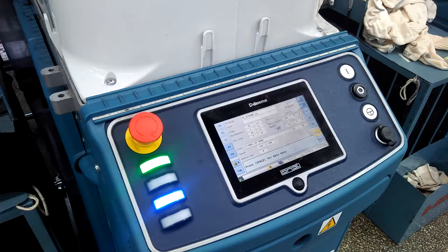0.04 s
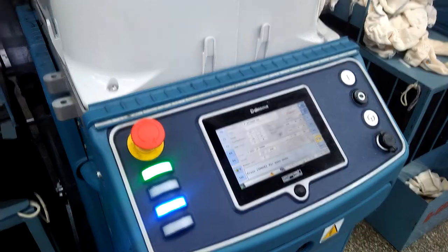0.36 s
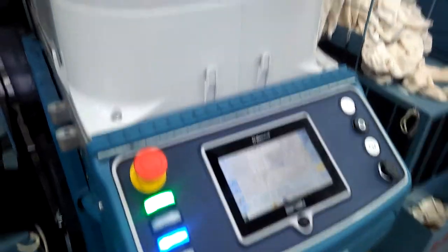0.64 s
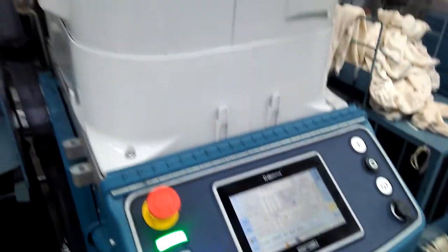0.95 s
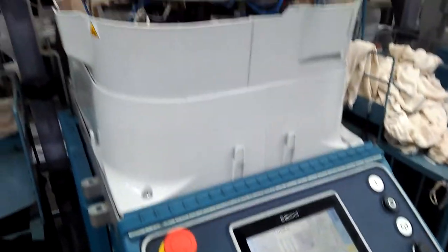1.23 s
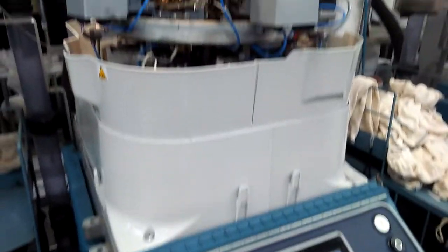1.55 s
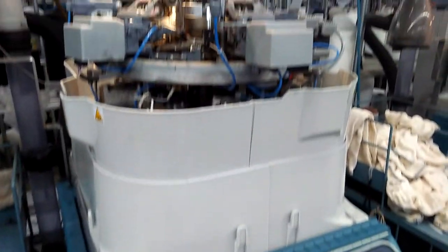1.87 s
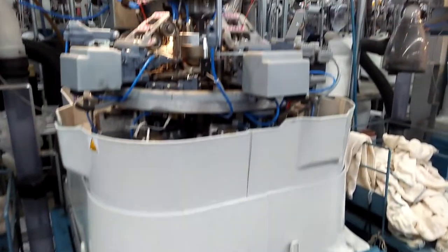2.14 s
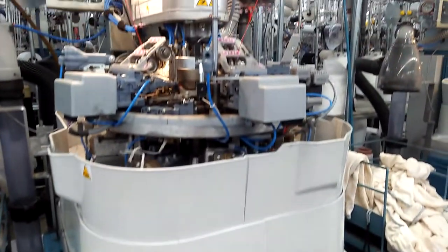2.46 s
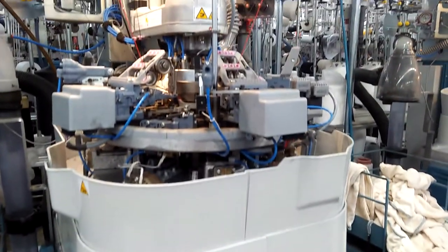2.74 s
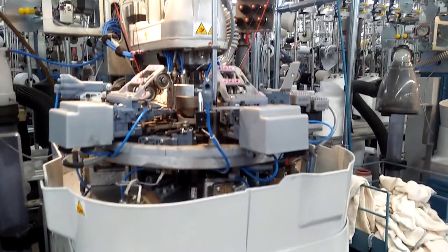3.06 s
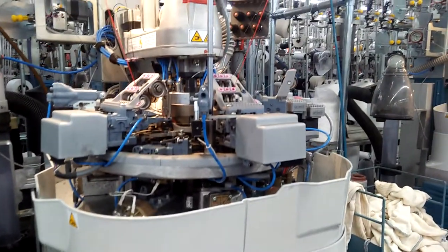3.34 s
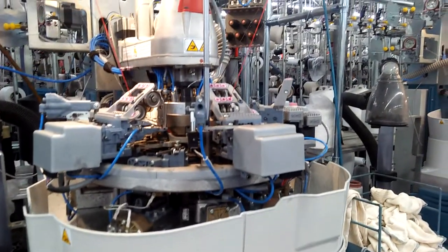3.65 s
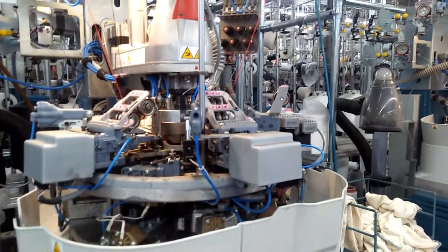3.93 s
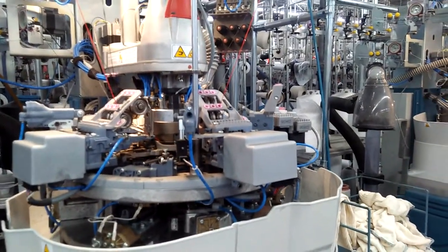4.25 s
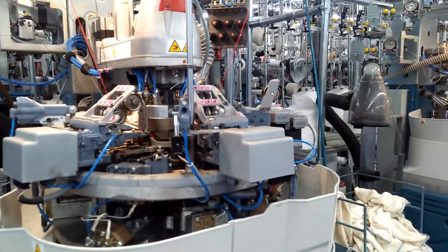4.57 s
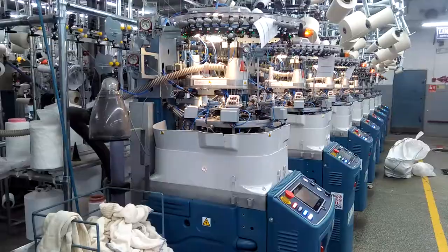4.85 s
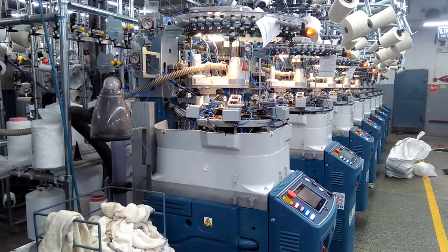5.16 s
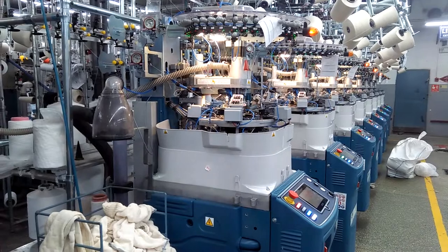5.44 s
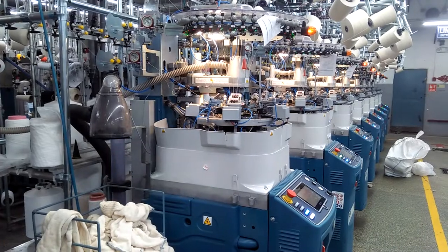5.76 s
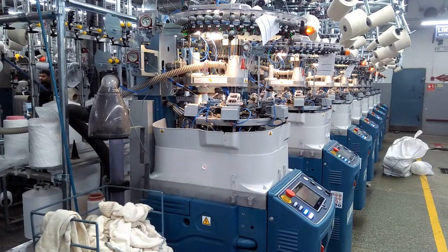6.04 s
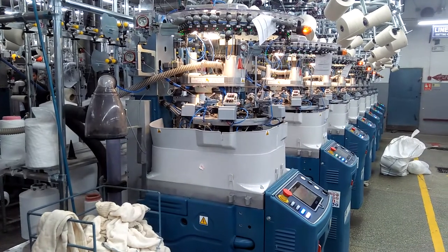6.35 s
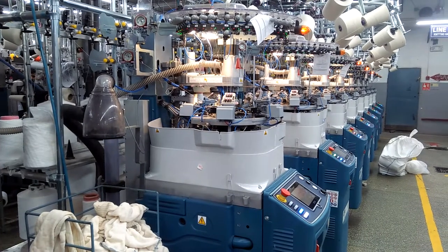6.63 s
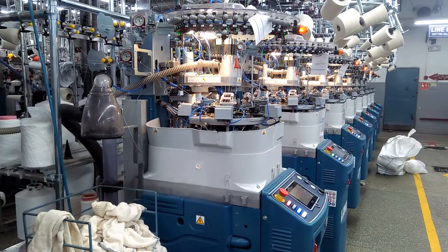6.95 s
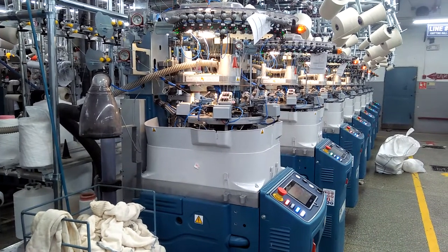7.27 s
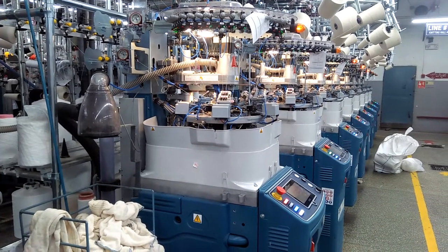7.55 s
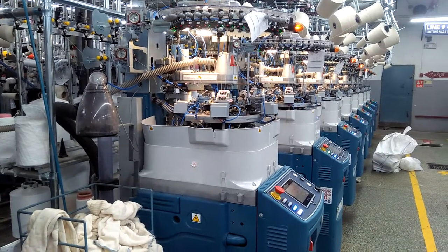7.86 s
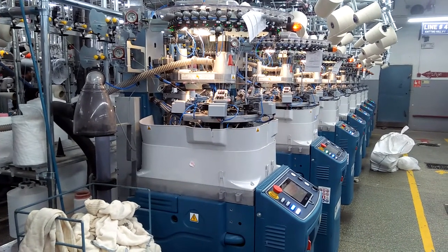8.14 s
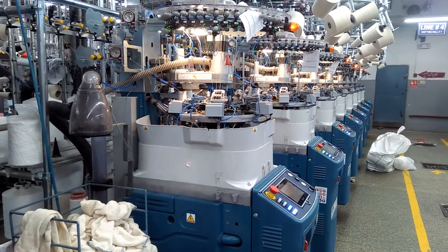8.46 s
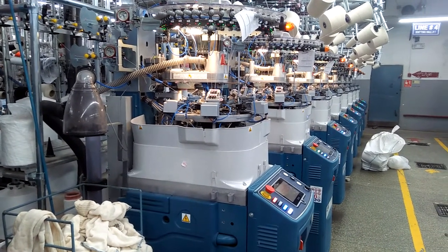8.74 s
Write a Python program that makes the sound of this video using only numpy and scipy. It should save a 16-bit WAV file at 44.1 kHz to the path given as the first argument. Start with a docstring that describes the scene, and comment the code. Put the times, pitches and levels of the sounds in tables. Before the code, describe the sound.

Many knitting machines clatter in a dense steely din over rumbling drives, with hisses and spits of compressed air.

```python
"""Sock knitting machines clatter: needles hit their cams and blur into one dense, steely din.
We hear it first beside one machine, then louder along the aisle. Levers knock and ring in the
hard-walled hall, pneumatic valves spit, compressed air hisses, and small parts scrape and ping.
Underneath sits a bed of rumbling drives and the slowly beating hum of two motors."""
import sys
import numpy as np
from scipy import signal
from scipy.fft import rfft, irfft, next_fast_len
from scipy.io import wavfile
from scipy.ndimage import uniform_filter1d, map_coordinates

SR = 44100
rng = np.random.default_rng(int(sys.argv[2]) if len(sys.argv) > 2 else 0)


def generate_wav(signal):
    """Clip the signal to [-1, 1] and save it as 16-bit WAV at the path in sys.argv[1]."""
    frames = np.transpose(np.atleast_2d(signal))
    scaled = np.clip(frames, -1, 1) * 32767
    pcm = np.round(scaled).astype(np.int16)
    wavfile.write(sys.argv[1], SR, pcm)


N = 388080
START_S, TOP_HZ = 0.7745, 14330
AISLE_S, WALK_S = 4.832, .4  # tone colour switches at AISLE_S; levels glide over WALK_S around it


# EQ of the din beside one machine: freq_hz, gain_db
NEAR_DIN_EQ = [(440, -2.0), (600, -3), (740, -2), (830, -3.5), (1010, -3), (1130, -3.0), (1450, -5.5),
               (1700, -4), (1900, -2.5), (2200, -1), (2450, -3.5), (2800, -6), (3400, -14), (4500, -15)]
# EQ of the din in the aisle: freq_hz, gain_db
AISLE_DIN_EQ = [(440, 0), (600, -2.5), (760, -4.5), (920, -2), (1010, -2), (1130, -1.5), (1500, -2),
                (1700, -2), (2000, 2), (2400, -1.5), (2700, -6.5), (3000, -8), (3400, -14), (4500, -19.5)]
# fader for the drone of the frames, before its trim: time_s, level_db
FRAME_FADER = [(0.8, -40.5), (2.6, -40), (3.6, -41), (3.8, -40.0), (4.2, -41), (4.6, -40.0), (5.1, -34.5),
               (5.5, -35.5), (6.2, -34.5), (6.9, -38), (7.0, -35.5), (7.4, -37), (7.5, -33.5), (8.78, -38)]
# fader for cams and needles, before their trims: time_s, level_db
CLATTER_FADER = [(0.8, -39), (1.0, -40.0), (1.1, -36), (1.8, -37.5), (3.7, -35.5), (4.5, -37.5), (5.1, -31),
                 (5.4, -30.5), (5.5, -33.5), (6.0, -29.5), (6.1, -31.5), (6.5, -30.5), (6.6, -32.5),
                 (7.1, -32.5), (7.3, -31.5), (8.1, -33.0), (8.2, -30.5), (8.78, -33.0)]

def clatter(blows_db=-5, near_clinks_db=-13, aisle_clinks_db=-10, surge_db=0.4):
    """Needles hit their cams; near blows stay distinct, the rest blur into the hall."""
    din = patchy_noise(patchy_db=2.0, bins=4, frames=4)
    din += amp(blows_db) * impacts(per_s=1200, scatter_db=2.5)
    din += amp(walk(near_clinks_db, aisle_clinks_db)) * clinks()
    din *= amp(cylinder_swell_db() + surge_db * wobble(60))  # the blows come in uneven bunches
    layer = lambda db, shape: amp(db) * place_eq(din, NEAR_DIN_EQ, AISLE_DIN_EQ, shape)
    frame_db, clatter_db = fader(FRAME_FADER), fader(CLATTER_FADER)
    frame = layer(frame_db + walk(-0.088, -0.64), lambda hz: band(hz, 382, 1120) * hollows(hz))
    # 1j shifts the phase a quarter turn, so neighbouring bands add in power
    cams = layer(clatter_db + walk(-2.5, -4.0), lambda hz: 1j * band(hz, 1227, 1897))
    needles = layer(clatter_db + walk(-3.0, -4.0), lambda hz: band(hz, 1940, 4780))
    return frame + cams + needles


def clinks(count=2000, t60=0.083, spread_db=6, lowest_hz=450, attack_s=0.0011):
    """Steel parts all over the hall, each ringing briefly at its own pitch; rms 1."""
    track, t = np.zeros(N), np.arange(SR // 22) / SR
    envelope = strike(t, attack_s, t60)
    for when, pitch, force in rng.random((count, 3)):
        hz = lowest_hz * 6.5 ** pitch
        gain = amp(spread_db * force) * np.sqrt(hz)
        add(track, when * N / SR, gain * envelope * np.sin(2 * np.pi * hz * t))
    return unit(track)


# nearest needle cylinder, beside one machine and then in the aisle: turn_rate_hz, crest_s, depth_db
CYLINDER_TURNS = [(3.42, 1.12, 0.3), (4.16, 5.11, 0.4)]

def cylinder_swell_db():
    """The din rises and falls once with each turn of the nearest cylinder."""
    t = np.arange(N) / SR
    near, aisle = (depth_db * np.cos(2 * np.pi * turn_rate_hz * (t - crest_s))
                   for turn_rate_hz, crest_s, depth_db in CYLINDER_TURNS)
    return walk(near, aisle)


# levers and cams striking home: start_s, relative_db, ring_hz
LEVER_HITS = [(4.898, -16, 2093), (4.982, -18.5, 2435), (5.138, -7.5, 2104), (5.336, -12, 1700),
              (5.828, -16, 1730), (6.185, -15.5, 977), (6.217, -14.5, 1940), (6.271, -14, 2260),
              (6.499, -10.5, 1705), (6.755, -17, 1555), (6.967, -13, 1766), (8.25, -14, 1610),
              (8.447, -14.5, 924)]

def knocks(t60=0.052, attack_s=0.0018, modes=20, trim_db=-8.5, wet_db=-7):
    """A lever lands and rings a cluster of short-lived steel modes; the hall answers."""
    track, t = np.zeros(N), np.arange(SR // 8) / SR
    for start_s, db, ring_hz in LEVER_HITS:
        modes_hz = ring_hz * rng.triangular(.35, .9, 1.45, (modes, 1))
        ring = unit(np.sin(2 * np.pi * (modes_hz * t + rng.random((modes, 1)))).sum(0))
        add(track, start_s, amp(db + trim_db) * strike(t, attack_s, t60) * ring)
    return track + amp(wet_db) * hall(track)


# EQ of a valve's spit: freq_hz, gain_db
SPIT_EQ = [(1000, -12), (3000, -6), (4800, -13), (5800, 2), (7500, 1.5), (9500, 0.5), (12000, -3),
           (14000, 1)]
# valve cues, with thud and ping set against the burst: start_s, relative_db, thud_db, ping_hz, ping_db
VALVE_CUES = [(5.314, -30, -20, 6900, -8), (5.3237, -24.5, -10, 12500, -10), (5.5417, -37, -20, 13100, 2),
              (6.006, -29.5, -4, 5800, -1), (6.3895, -24.5, -18, 10400, -13), (6.4295, -26, -23, 7430, -3),
              (6.441, -28, -6, 5900, -6), (6.498, -12.5, -9.5, 3540, -15.5), (7.6911, -31, -8, 13500, -4),
              (7.9789, -33, 11.5, 11900, 0)]

def valves(spit_t60=0.019, thud_t60=0.038, ping_t60=0.024, ping_width_hz=330,
           trail_db=-23, trail_t60=0.39, attack_s=0.00065, trim_db=4.5):
    """Each valve spits a sharp burst that thuds and pings in its housing; air trails away after it."""
    track, t = np.zeros((2, N)), np.arange(SR // 2) / SR
    puff = lambda shape: unit(filtered(rng.standard_normal((2, len(t))), shape))
    spit = lambda hz: amp(along(SPIT_EQ, hz))
    focus = amp([[0], [-6]])  # mid, side: the hit is narrower than its trail
    for start_s, db, thud_db, ping_hz, ping_db in VALVE_CUES:
        resonance = lambda hz: 1 / (1 + ((hz - ping_hz) / ping_width_hz) ** 2)
        burst = amp(-60 * t / spit_t60) * puff(spit)
        thud = amp(thud_db - 60 * t / thud_t60) * puff(lambda hz: band(hz, 1760, 2830, order=5))
        ping = amp(ping_db - 60 * t / ping_t60) * puff(resonance)
        trail = amp(trail_db - 60 * t / trail_t60) * puff(spit)
        opening = amp(db + trim_db) * (1 - np.exp(-t / attack_s))
        add(track, start_s, opening * (focus * (burst + thud + ping) + trail))
    return widen(track)


# EQ of the air beside one machine: freq_hz, gain_db
NEAR_AIR_EQ = [(4200, -5.5), (5400, -0.5), (6300, 1.5), (7300, 4.5), (8500, -1), (10000, -4), (12500, -8.5),
               (14000, -4)]
# EQ of the air in the aisle: freq_hz, gain_db
AISLE_AIR_EQ = [(4200, 0), (5200, 1), (5900, 2.5), (6400, 2.5), (6900, 4), (8000, 0), (9500, -7),
                (11000, -8.5), (12500, -11), (13400, -4), (14000, -8)]
# air jets that open, blow and die away: start_s, length_s, hiss_db, spray_db
JET_CUES = [(0.742, 0.55, -43.7, -39.3), (1.45, 0.37, -52, -49.5), (1.966, .05, -53, -47),
            (2.267, 0.34, -51, -44.5), (2.834, .15, -57, -49), (3.17, 0.2, -54, -45.5),
            (4.11, 0.68, -52, -49.5), (5.15, .05, -45.5, -43.5), (5.3, 0.074, -43, -43),
            (5.564, 0.063, -50.5, -45), (6.006, 0.47, -47.5, -49), (6.4, .1, -43, -45.5),
            (6.935, .07, -53, -56), (7.197, .06, -55, -54), (7.393, .06, -52, -53),
            (7.69, 0.094, -47.5, -47.5), (7.964, 0.15, -52, -49.5), (8.727, .07, -51, -53)]

def air(hiss_db=(-51, -49.4), spray_db=(-51.3, -56), flutter_db=1.0, ticks_db=-10):
    """Suction tubes hiss steadily and jets blow over them; needle latches tick finely in the hiss."""
    power = amp([walk(*hiss_db), walk(*spray_db)]) ** 2
    for start_s, length_s, jet_hiss_db, jet_spray_db in JET_CUES:
        blow = swell(start_s, length_s, attack_s=0.0081, t60=1.44)
        power += (amp([[jet_hiss_db], [jet_spray_db]]) * blow) ** 2
    hiss_gain, spray_gain = np.sqrt(power)
    rush = patchy_noise(patchy_db=1.65, bins=8, frames=3)
    ticks = amp(ticks_db) * impacts(per_s=870, scatter_db=3.5)
    flow = np.array([rush + ticks, rng.standard_normal(N)])  # mid, side
    hiss = hiss_gain * place_eq(flow, NEAR_AIR_EQ, AISLE_AIR_EQ, lambda hz: band(hz, 4200, 9700))
    spray = spray_gain * place_eq(flow, NEAR_AIR_EQ, AISLE_AIR_EQ, lambda hz: 1j * band(hz, 8620, 13650))
    return widen(amp(flutter_db * wobble(32)) * (hiss + spray))


# parts that scrape and sing for a moment: start_s, length_s, level_db, pitch_hz
SCRAPE_CUES = [(2.219, .1, -42.5, 2127), (3.356, .16, -42, 2120), (7.22, 0.38, -35.5, 2407)]

def scrapes(width_hz=205, rough_db=1.1, flat_share=.16, rise_s=0.064):
    """Rubbing steel sings in one rough resonance that starts flat and slides up as the part takes hold."""
    track, t = np.zeros(N), np.arange(N) / SR
    for start_s, length_s, db, pitch_hz in SCRAPE_CUES:
        glide_hz = pitch_hz * (1 - flat_share * np.exp(-np.maximum(t - start_s, 0) / rise_s))
        envelope = swell(start_s, length_s, attack_s=.02, t60=2.5)
        track += amp(db) * envelope * fuzzy_tone(glide_hz, width_hz)
    return amp(rough_db * wobble(25)) * track


# light taps on steel: start_s, level_db
PING_CUES = [(1.02, -41), (3.345, -38)]

def pings(ring_hz=3750, t60=0.066, attack_s=.001):
    """A small steel part is tapped and rings at one pitch."""
    track, t = np.zeros(N), np.arange(SR // 8) / SR
    for start_s, db in PING_CUES:
        add(track, start_s, amp(db) * strike(t, attack_s, t60) * np.sin(2 * np.pi * ring_hz * t))
    return track


# EQ of the drives' rumble: freq_hz, gain_db
RUMBLE_EQ = [(20, -22), (36, -20), (48, -20), (62, 0.5), (100, 0), (122, 4), (138, -1), (156, 3.5),
             (185, -2.5), (260, 0), (315, 0), (400, -9), (520, -29)]
# fader for the rumble, before its trim: time_s, level_db
RUMBLE_FADER = [(0.8, -49), (1.1, -51.0), (1.5, -43.5), (1.6, -48.5), (4.1, -48.0), (4.3, -49),
                (4.8, -49.5), (4.9, -42.5), (5.5, -42.5), (5.9, -45.0), (7.6, -40.5), (7.9, -43),
                (8.3, -40.5), (8.78, -45)]
# blurred tones of gears and spindles: pitch_hz, width_hz, relative_db
GEAR_TONES = [(159, 9, -57), (313.3, 27, -59), (424.4, 12, -64.5), (600.5, 40, -51), (911, 40, -51),
              (1010, 40, -54), (6860, 86, -66)]

def drives(near_whirr_db=-7, aisle_whirr_db=-1.0, trim_db=0.28, drift_db=0.8):
    """Belts and gears rumble and whirr; the aisle opens onto more of them."""
    noise = patchy_noise(patchy_db=3.5, bins=2, frames=6)
    rumble = unit(filtered(noise, lambda hz: amp(along(RUMBLE_EQ, hz)) * hollows(hz)))
    whirr = sum(amp(db) * fuzzy_tone(hz, width_hz) for hz, width_hz, db in GEAR_TONES)
    rumble_db = fader(RUMBLE_FADER) + trim_db + drift_db * wobble(6.8)
    return amp(rumble_db) * rumble + amp(walk(near_whirr_db, aisle_whirr_db)) * whirr


def motors(hum_hz=49.5, beat_hz=0.678, in_step_s=6.67, waver_rad=.3,
           first_db=(-57, -51.5), second_db=(-64, -53), far_db=(-59, -54)):
    """Two motors hum almost in tune and beat slowly against each other; far ones blur around them."""
    t = np.arange(N) / SR - in_step_s
    phase = 2 * np.pi * hum_hz * t + waver_rad * wobble(2.94)
    first = amp(walk(*first_db)) * np.sin(phase)
    second = amp(walk(*second_db)) * np.sin(phase + 2 * np.pi * beat_hz * t)
    far = amp(walk(*far_db)) * fuzzy_tone(hum_hz, width_hz=9)
    return np.sqrt(2) * (first + second) + far


# reverb time of the hall: freq_hz, t60_s
HALL_DECAY = [(200, 0.67), (2000, 1), (7000, 0.79), (14000, 0.12)]

def hall(x):
    """Hard walls return a tail in which each frequency dies at its own speed."""
    hz, t, spectrum = signal.stft(rng.standard_normal(SR), SR, nperseg=256)
    decay = amp(-60 * t / along(HALL_DECAY, hz)[:, None])
    tail = signal.istft(spectrum * decay, SR, nperseg=256)[1]
    return signal.fftconvolve(x, tail / np.linalg.norm(tail))[:N]


# notches in the din and the rumble: centre_hz, width_hz, depth_db
LOW_NOTCHES = [(239, 13.3, 6), (374, 16.5, 14.5), (519, 24.5, 9), (660, 16, 4.5)]

def hollows(hz):
    """Gain of the narrow dips that hollow out the low end."""
    return amp(-sum(depth_db * np.exp(-.5 * ((hz - centre_hz) / width_hz) ** 2)
                    for centre_hz, width_hz, depth_db in LOW_NOTCHES))


# likeness of left and right, 1 being mono: freq_hz, correlation
STEREO_IMAGE = [(3000, 1), (4500, 1), (6800, 0.75), (10000, 0.24), (14000, 0.44)]

def widen(pair, mono_below_hz=3000):
    """Two unrelated signals become mid and side: mono in the bass, wide in the treble."""
    angle = lambda hz: np.arccos(np.clip(along(STEREO_IMAGE, hz), 0, 1)) / 2 * (hz > mono_below_hz)
    mid, side = filtered(pair, lambda hz: np.array([np.cos(angle(hz)), np.sin(angle(hz))]))
    return np.array([mid + side, mid - side])


def walk(near, aisle):
    """Glide from a value beside the first machine to a value in the aisle."""
    return near + (aisle - near) * np.clip((np.arange(N) / SR - AISLE_S) / WALK_S + .5, 0, 1)


def place_eq(x, near_eq, aisle_eq, shape):
    """Colour x for the spot beside one machine, then for the aisle; rms 1 in both."""
    near, aisle = (unit(filtered(x, lambda hz: amp(along(eq, hz)) * shape(hz)))
                   for eq in (near_eq, aisle_eq))
    return np.where(np.arange(N) < AISLE_S * SR, near, aisle)


def impacts(per_s, scatter_db):
    """Countless small blows of uneven strength, rms 1."""
    clicks = (rng.random(N) < per_s / SR) * rng.choice([-1, 1], N)
    return unit(clicks * amp(scatter_db * rng.standard_normal(N)))


def patchy_noise(patchy_db, bins, frames):
    """White noise whose colour shifts in patches, bins wide and frames long; rms 1."""
    spectrum = signal.stft(rng.standard_normal(N), nperseg=1024)[2]
    patches = uniform_filter1d(uniform_filter1d(rng.standard_normal(spectrum.shape), bins, 0), frames, 1)
    return unit(signal.istft(spectrum * amp(patchy_db * unit(patches)), nperseg=1024)[1][:N])


def fuzzy_tone(hz, width_hz):
    """A narrow band of noise, rms 1; hz may glide."""
    phase = 2 * np.pi * np.cumsum(hz * np.ones(N)) / SR
    return unit(wobble(width_hz) * np.cos(phase) + wobble(width_hz) * np.sin(phase))


def wobble(knots_per_s):
    """A smooth random curve."""
    coarse = np.arange(0, N + 32, 32)
    knots = rng.standard_normal(int(N * knots_per_s / SR) + 4)
    return np.interp(np.arange(N), coarse, map_coordinates(knots, [coarse * knots_per_s / SR]))


def strike(t, attack_s, t60):
    """Percussive envelope: attack and decay."""
    return (1 - np.exp(-t / attack_s)) * amp(-60 * t / t60)


def swell(start_s, length_s, attack_s, t60):
    """Attack, hold and release, one gain per sample."""
    t = np.maximum(np.arange(N) / SR - start_s, 0)
    return (1 - np.exp(-t / attack_s)) * amp(-60 * np.maximum(t - length_s, 0) / t60)


def fader(points):
    """Ride through (time_s, level_db) points, one level per sample."""
    return np.interp(np.arange(N) / SR, *np.transpose(points))


def along(points, hz):
    """Read (freq_hz, value) points on a log axis."""
    freqs, values = np.transpose(points)
    return np.interp(np.log(hz + 1), np.log(freqs + 1), values)


def filtered(x, response):
    """Shape x with a gain that depends on frequency."""
    n = x.shape[-1]
    padded = next_fast_len(n + 8192, True)
    return irfft(rfft(x, padded) * response(np.fft.rfftfreq(padded, 1 / SR)), padded)[..., :n]


def band(hz, lo_hz, hi_hz, order=10):
    """Gain of a steep band-pass."""
    return ((1 + (lo_hz / (hz + 1)) ** (2 * order)) * (1 + (hz / hi_hz) ** (2 * order))) ** -.5


def add(track, start_s, sound):
    """Drop a sound into a track."""
    part = track[..., round(start_s * SR):][..., :sound.shape[-1]]
    part += sound[..., :part.shape[-1]]


def amp(db):
    """Decibels to gain."""
    return 10 ** (np.asarray(db) / 20)


def unit(x):
    """Scale to rms 1."""
    return x / np.sqrt(np.mean(x ** 2) + 1e-20)


def scene():
    """The mix: machinery in the centre, air and valves spread wide."""
    return clatter() + drives() + motors() + scrapes() + knocks() + pings() + air() + valves()


def record(dry):
    """The sound cuts in after a silence, with a steep high cut at TOP_HZ."""
    high_cut = lambda hz: np.clip((TOP_HZ - hz) / 150 + .5, 0, 1)
    return filtered(dry * (np.arange(N) >= START_S * SR), high_cut)


dry = scene()
out = record(dry)
generate_wav(out)
```